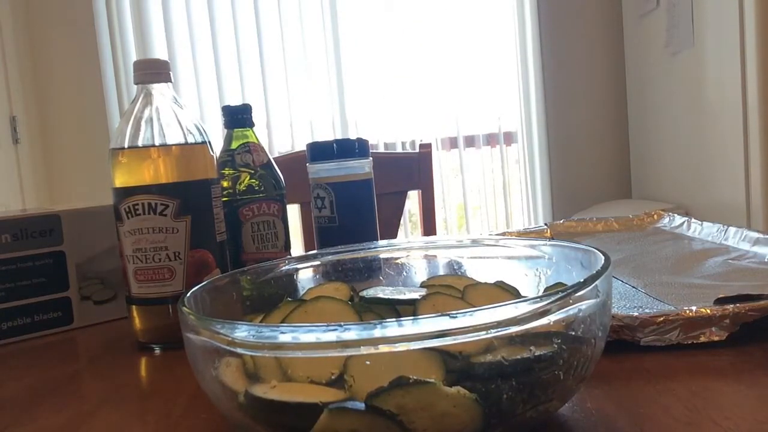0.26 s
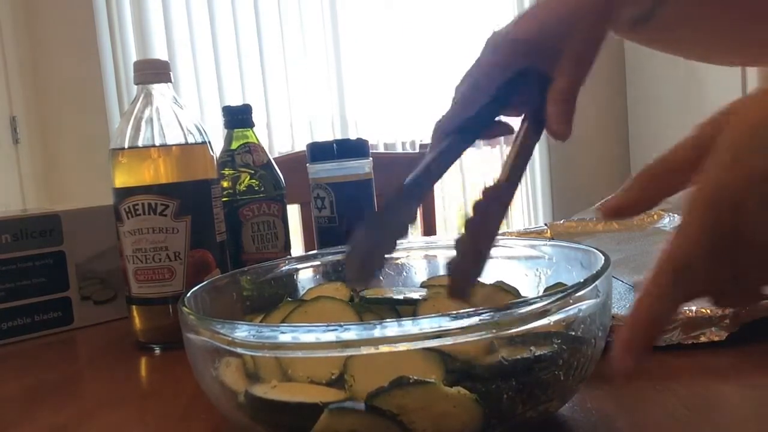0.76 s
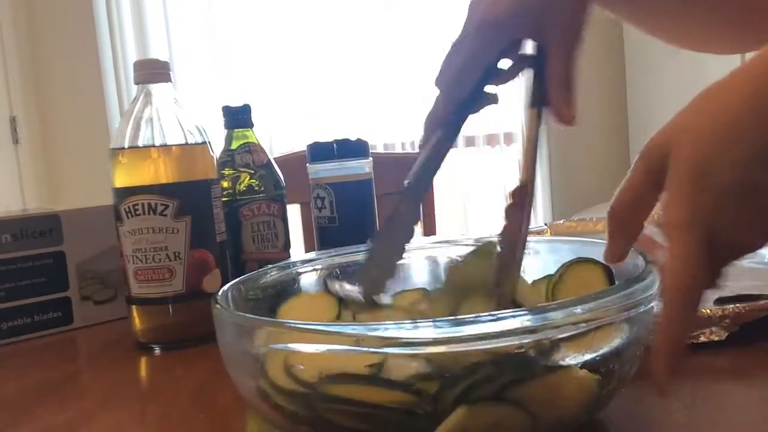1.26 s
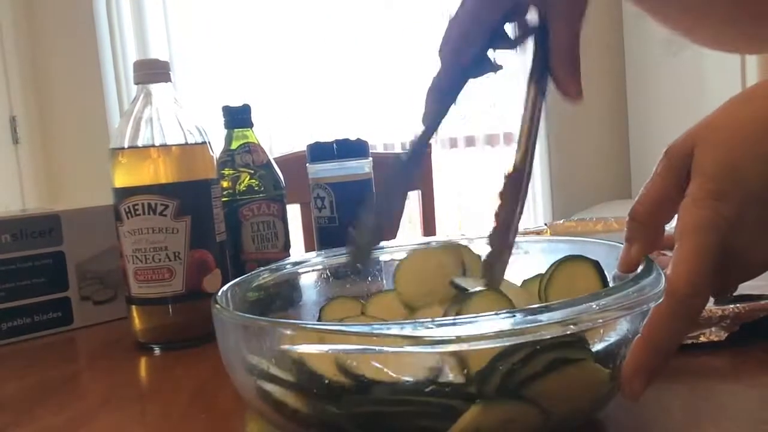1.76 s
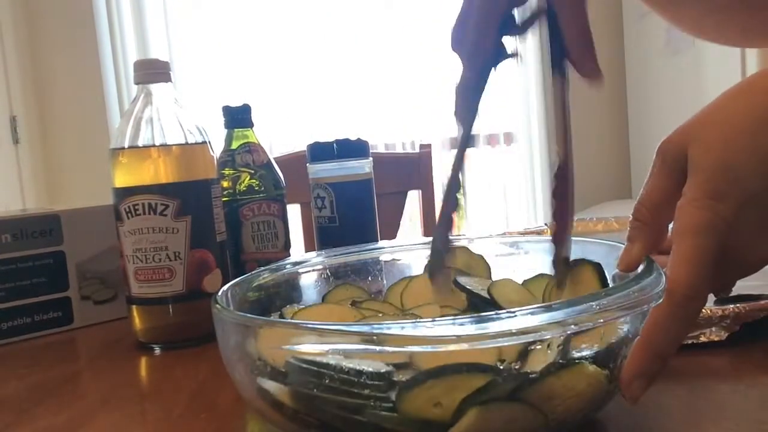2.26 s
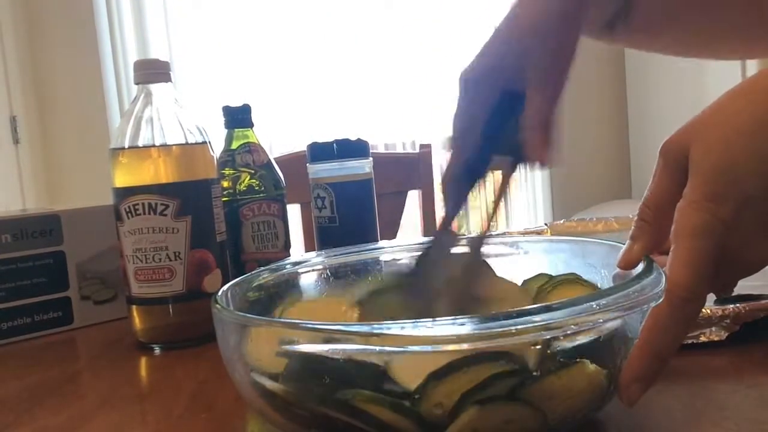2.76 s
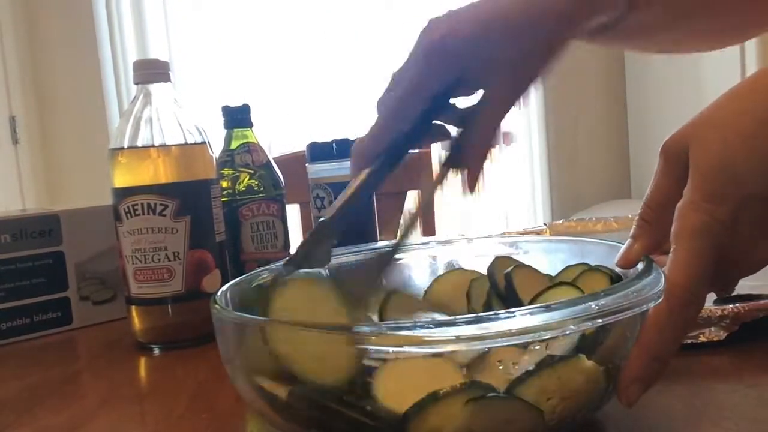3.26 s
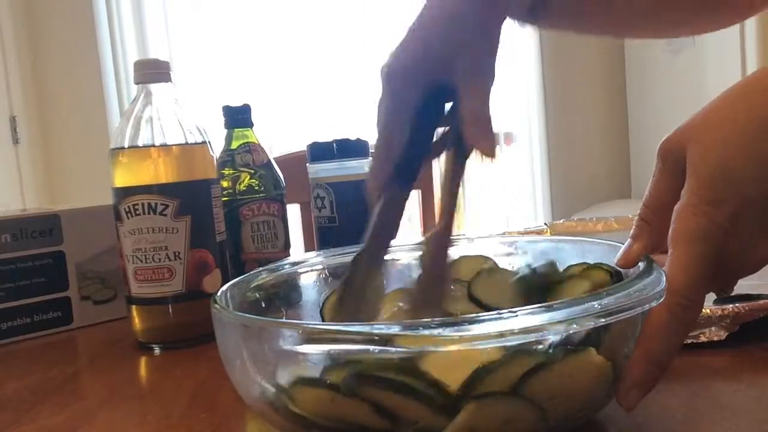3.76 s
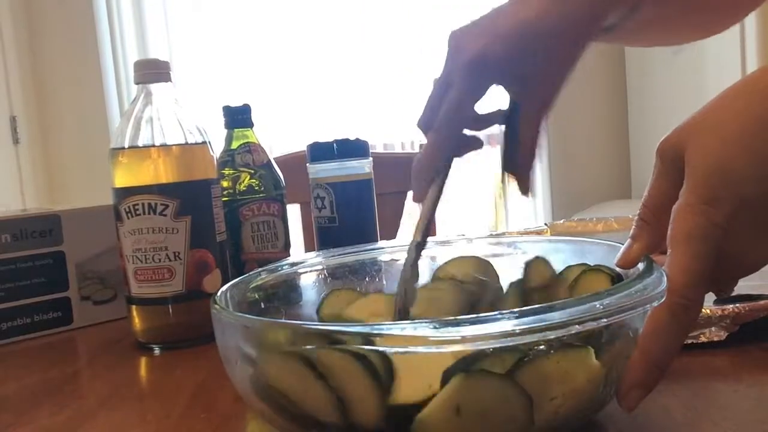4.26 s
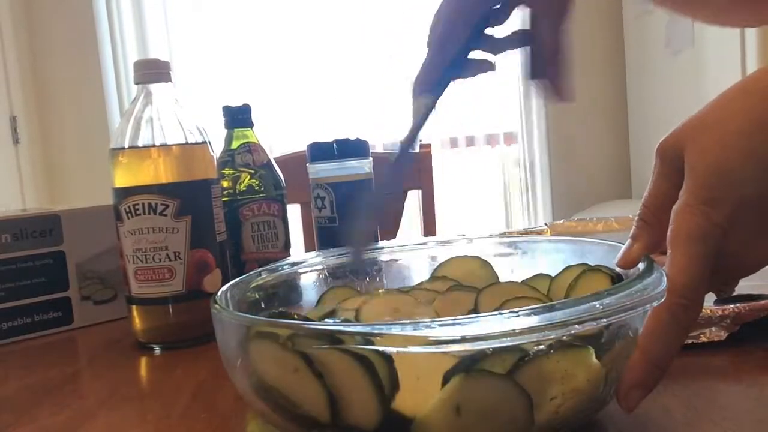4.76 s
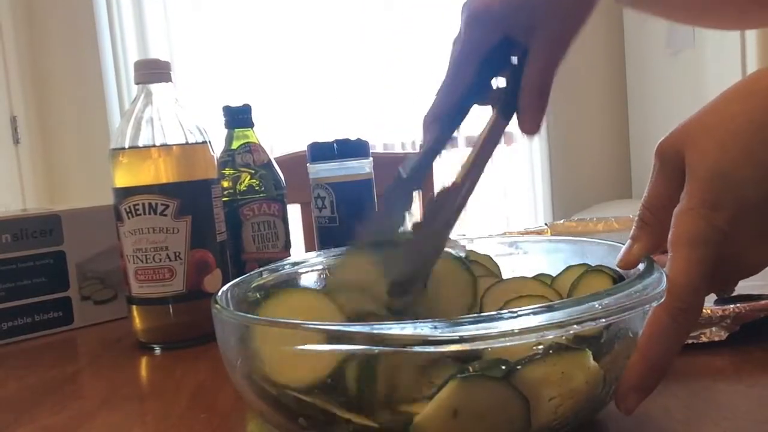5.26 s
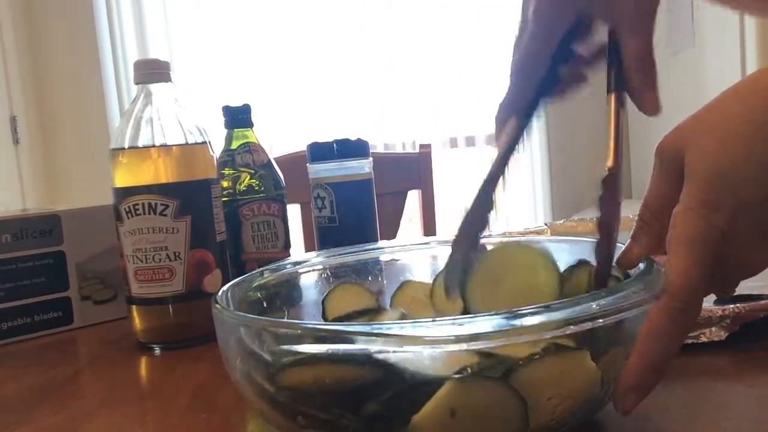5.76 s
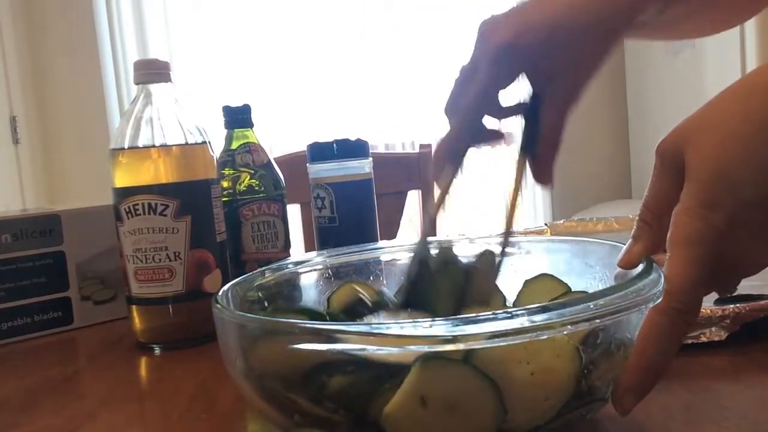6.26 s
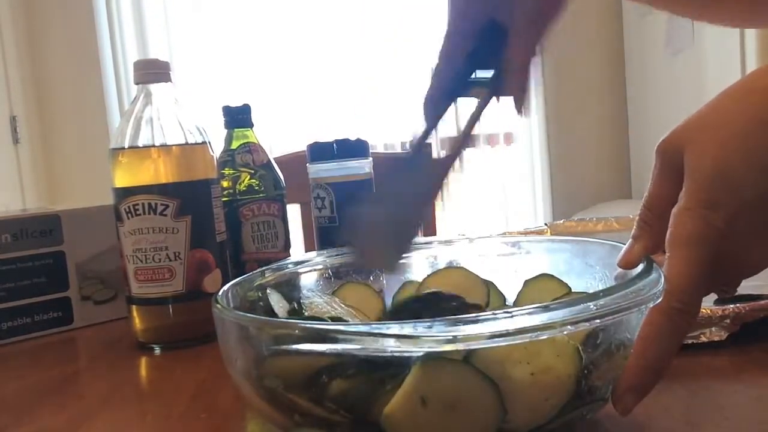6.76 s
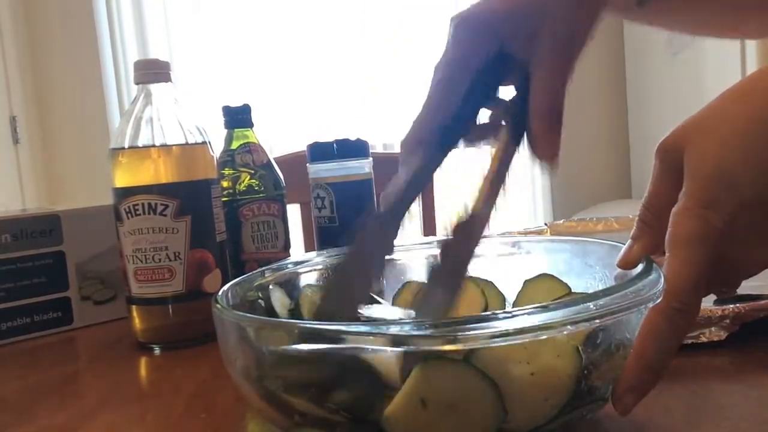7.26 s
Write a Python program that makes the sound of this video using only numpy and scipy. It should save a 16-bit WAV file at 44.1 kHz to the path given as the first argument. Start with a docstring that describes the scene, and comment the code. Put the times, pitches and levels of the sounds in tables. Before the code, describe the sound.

Wet vegetable slices slide, rustle and smack softly as steel tongs toss them in a thick glass bowl. Every so often the tongs strike the glass in a quick cluster of short clinks, and the bowl knocks on a wooden table, loudest twice in the second half. It is all heard close up in a kitchen with a short reverb and a faint, steady appliance hum.

```python
"""Wet vegetable slices slide and rustle over an appliance hum, tossed by steel tongs in a thick glass bowl.
The bowl knocks on a wooden table and the tongs clink on the glass; each blow rings modes under a crack.
Sliding slices make clumps of tiny pops and shake the table; slices parting or landing smack.
All of it is close, in a kitchen with a short reverb."""
import sys
import numpy as np
from scipy import signal
from scipy.fft import rfft, irfft, next_fast_len
from scipy.io import wavfile
from scipy.ndimage import uniform_filter1d

SR = 44100
rng = np.random.default_rng(int(sys.argv[2]) if len(sys.argv) > 2 else 0)


def dump(signal):
    """Clip the signal to [-1, 1] and save it as 16-bit WAV at the path in sys.argv[1]."""
    limited = np.clip(np.atleast_2d(signal).T, -1, 1)
    pcm = np.round(limited * 32767).astype(np.int16)
    wavfile.write(sys.argv[1], SR, pcm)


N = 330792


def gain_of(db):
    """Decibels to an amplitude factor."""
    return 10 ** (np.asarray(db) / 20)


def unit_rms(x):
    """Scales to rms 1."""
    return x / np.sqrt(np.mean(x ** 2) + 1e-20)


def unit_peak(x):
    """Scales to peak 1."""
    return x / (abs(x).max() + 1e-12)


def curve_at(points, hz):
    """Interpolates on a log-frequency axis."""
    f, value = np.transpose(points)
    return np.interp(np.log(hz + 1), np.log(f + 1), value)


def add(mix, start_s, sound):
    """Mixes a sound in at start_s."""
    part = mix[round(start_s * SR):][:len(sound)]
    part += sound[:len(part)]


def wander(top_hz):
    """Slow random curve, rms 1: 20 sines up to top_hz."""
    t = np.arange(0, N + 256, 256) / SR
    slow = sum(np.sin(2 * np.pi * (f * t + rng.random())) for f in top_hz * np.linspace(.05, 1, 20))
    return np.interp(np.arange(N) / SR, t, unit_rms(slow))


def colour(x, spectrum):
    """Filters x by a dB curve; rms 1."""
    size = next_fast_len(N)
    response = gain_of(curve_at(spectrum, np.fft.rfftfreq(size, 1 / SR)))
    return unit_rms(irfft(rfft(x, size) * response, size)[:N])


def swells(peak_s, swell_s, fade_s, db, rest_db):
    """Envelope of events above a resting level; swell_s and fade_s each span 20 dB."""
    t = np.arange(0, N + 64, 64)[:, None] / SR
    away = np.where(t < peak_s, (peak_s - t) / swell_s, (t - peak_s) / fade_s)
    power = (gain_of(db - 20 * away) ** 2).sum(1) + gain_of(rest_db) ** 2
    return np.interp(np.arange(N) / SR, t[:, 0], np.sqrt(power))


def resonate(force, modes, fall_db=60):
    """Drives modes that each lose fall_db over their listed t60; rms 1."""
    t = np.arange(8000) / SR
    ring = sum(gain_of(db - fall_db * t / t60) * np.sin(2 * np.pi * hz * t) for hz, db, t60 in modes)
    return unit_rms(signal.oaconvolve(force, ring)[:N])


def pop(hz, cycles):
    """Dying cycles that glide up as a pocket of air closes; long squeaks glide less."""
    u = np.arange(0, 3 * abs(cycles), hz / SR)
    age = u / abs(cycles)
    envelope = np.minimum(u / 1.4, 1) * np.exp(-2.5 * age)
    glide = 1 + 0.083 * age / (1 + (cycles / 12) ** 2)
    return envelope * np.sin(2 * np.pi * u * glide)


# Motor tones. Each row: frequency in Hz, level in dB.
MOTOR_TONES = [(59.2, -55), (290.7, -62.5), (522.2, -57), (581.4, -70), (1367, -81), (1427, -73.5)]
# Air noise. Each row: frequency in Hz, relative density in dB.
AIR_SPECTRUM = [(12, -40), (20, -8.5), (65, -2.5), (82, 2), (105, -4), (243, -2.5), (296, -11.5), (463, -5),
                (519, -10), (580, -14), (790, -20.5), (1200, -18.5), (1420, -15), (1940, -26),
                (5300, -30.5), (5720, -27), (6100, -32.5), (8000, -38), (13400, -49.5), (15100, -52.5),
                (16400, -71.5)]


def appliance_hum():
    """Slightly wavering motor tones over steady air noise."""
    t = np.arange(N) / SR
    trim_db, waver_db, drift_rad = 2, 1.3, .5
    air_db, sway_db = -53, 1.2
    tones = np.zeros(N)
    for hz, db in MOTOR_TONES:
        level = gain_of(db + trim_db + waver_db * wander(12))
        tones += level * np.sin(2 * np.pi * hz * t + drift_rad * wander(4.5))
    air = gain_of(air_db + sway_db * wander(3.7)) * colour(rng.standard_normal(N), AIR_SPECTRUM)
    return tones + air


def wet_patches(x, depth_db):
    """Wet patches come and go: spots some 700 Hz wide and 40 ms long swell and sink."""
    spectrum = signal.stft(x, nperseg=256, noverlap=192)[2]
    patches = rng.standard_normal(spectrum.shape[::-1]).T
    for _ in range(2):
        patches = uniform_filter1d(uniform_filter1d(patches, size=4, axis=0), size=20, axis=1)
    spectrum *= gain_of(depth_db * unit_rms(patches))
    return unit_rms(signal.istft(spectrum, nperseg=256, noverlap=192)[1][:N])


# Rustle filter. Each row: frequency in Hz, relative gain in dB.
RUSTLE_SPECTRUM = [(350, -69.5), (600, 6.5), (1230, -8.5), (1350, -20.5), (1610, -4), (2830, -10.5),
                   (3940, -12.5), (14300, -32), (16000, -63.5)]


def wet_rustle():
    """Clumps of tiny wet pops over a soft sliding hiss; the glass answers faintly."""
    base_pops_per_s, clump_db = 2500, 8.1
    pop_chance = base_pops_per_s / SR * gain_of(clump_db * wander(40))
    size_db = 8.2 * np.minimum(rng.exponential(1, N), 3.2)
    impulses = gain_of(size_db) * (rng.random(N) < pop_chance)
    pitch_index = rng.integers(0, 24, N)
    pops = sum(signal.oaconvolve(impulses * (pitch_index == k), pop(hz, cycles=2.5))[:N] * np.sqrt(hz)
               for k, hz in enumerate(np.geomspace(900, 14000, 24)))
    hiss = 1.6 * rng.standard_normal(N)
    rustle = colour(unit_rms(np.diff(pops, prepend=0)) + hiss, RUSTLE_SPECTRUM)
    rustle = wet_patches(rustle, depth_db=3)
    chime = resonate(np.diff(rustle, prepend=0), GLASS_MODES, fall_db=50)
    return rustle + gain_of(-15) * chime


# Slices sliding. Each row: peak time, swell and fade in seconds, rustle level in dB, rumble level in dB.
SLICE_SLIDES = [(.11, 0.2, 0.092, -61, -52), (.35, 0.086, 0.15, -49, -64), (.7, 1, 0.85, -61.5, -56.5),
                (1.06, 0.17, 0.076, -55.5, -69), (1.18, 0.1, 0.25, -53.5, -47),
                (1.47, 0.043, 0.29, -51, -49.5), (1.66, 0.57, 0.026, -60, -66),
                (2.0, 0.072, 0.27, -53.5, -48), (2.335, 0.018, 0.045, -63, -49.5),
                (2.44, 0.067, 0.1, -49.5, -41.5), (2.57, 0.053, 0.026, -69, -54),
                (2.863, 0.22, .13, -50.5, -50), (3.2, 0.054, 0.3, -54.5, -41.5),
                (3.321, 0.21, 0.19, -54, -48), (3.621, 0.14, 0.47, -63, -62.5),
                (3.85, 0.13, 0.14, -57.5, -52.5), (4.019, 0.12, 0.033, -66, -64.5),
                (4.19, 0.28, 0.019, -54.5, -59), (4.299, 0.25, 0.24, -55.5, -49.5),
                (4.562, 0.091, 0.98, -63, -56.5), (5.0, 0.047, 0.3, -52.5, -53),
                (5.37, 0.32, 0.12, -65, -54.5), (5.648, 0.51, 0.35, -59.5, -45.5),
                (5.951, .02, 0.087, -54.5, -49), (6.199, 0.17, 0.076, -64, -39),
                (6.601, 0.32, 0.4, -62, -57.5), (6.941, .11, 0.068, -68, -48.5),
                (7.001, 0.034, 0.21, -57, -50), (7.2, 0.42, 0.049, -68, -53), (7.46, 0.32, 0.5, -55.5, -49)]


def sliding_slices():
    """Slices rustle as they slide and splash at each smack; soft pushes shake the table's low modes."""
    peak_s, swell_s, fade_s, rustle_db, rumble_db = np.transpose(SLICE_SLIDES)
    smack_s, *_, splash_db = np.transpose(SLICE_SMACKS)
    lumpy_db, stutter_db = 3.2, 1.8
    rustle = wet_rustle()
    pushes = rng.standard_normal(N) * gain_of(lumpy_db * wander(25))
    rumble = resonate(pushes, TABLE_MODES[1:5])
    rumble *= swells(peak_s, swell_s, fade_s, rumble_db, rest_db=-61.5)
    slides = swells(peak_s, swell_s, fade_s, rustle_db, rest_db=-71)
    slides *= gain_of(stutter_db * wander(30))
    splashes = swells(smack_s, swell_s=0.0028, fade_s=0.019, db=splash_db, rest_db=-71)
    return rustle * np.hypot(slides, splashes) + rumble


def strikes(blows, modes, bands, voice, *, pivot_hz, rise_s, soften, punch, crack_t60_s,
            rattle_db, rattle_t60_s, rattle_loss, favour_db, favour_octaves, focus,
            snap_db, snap_s, snap_delay_s):
    """Each blow rings the modes, band by band, under a short crack; hardness and spot colour it."""
    longest_press_s, crack_loss = 0.00081, 0.05
    spread_db, detune = 3, .0025  # slices and hand shift the modes from blow to blow
    out, t = np.zeros(N), np.arange(SR // 4) / SR
    hz, mode_db, t60 = np.transpose(modes)[:, :, None]
    band_db, spot_db = np.transpose(voice)
    octaves = np.log2(np.prod(bands, axis=1) / pivot_hz ** 2) / 2
    for start_s, blow_db, hardness, spot, ring_factor, crack_db, favoured_hz in blows:
        press_s = min(rise_s * gain_of(-soften * blow_db), longest_press_s)  # light blows press longer
        contact = (1 - np.exp(-t / press_s)) ** 2
        # The spot hit rings most near one pitch, light taps most purely.
        nearness = np.exp(-(np.log2(hz / favoured_hz) / favour_octaves) ** 2)
        lift_db = favour_db * nearness + focus * blow_db * (1 - nearness)
        level_draw, pitch_draw = rng.standard_normal((2, *hz.shape))
        ring_db = mode_db + lift_db + spread_db * level_draw - 60 * t / (t60 * abs(ring_factor))
        rings = -contact * gain_of(ring_db) * np.sin(2 * np.pi * hz * (1 + detune * pitch_draw) * t)
        splinters, chatter = rng.standard_normal((2, len(t)))
        spike = punch * (abs(t - press_s) < .5 / SR)
        burst = splinters * gain_of(-60 * t / crack_t60_s) - spike
        rattle = (t == 0) + chatter * gain_of(rattle_db - 60 * t / rattle_t60_s)
        u = (t - snap_delay_s) / snap_s
        snap = u * np.exp(-u ** 2) / (1 + abs(u))  # the surfaces meet: one push and pull of air
        add(out, start_s, gain_of(blow_db + snap_db) * snap)
        levels_db = blow_db + band_db + hardness * octaves + spot * spot_db
        for level_db, (lo, hi) in zip(levels_db, bands):
            inside = (hz[:, 0] > lo) & (hz[:, 0] <= hi)
            band_lift_db = lift_db[inside].max(initial=focus * blow_db)
            band_rattle = rattle * gain_of(-t * hi * rattle_loss)
            ringing = signal.fftconvolve(rings[inside].sum(0), band_rattle)[:len(t)]
            ringing *= 1 - np.exp(-t * lo / 0.47)  # builds over about half a cycle
            crack = signal.sosfilt(signal.butter(3, [lo, hi], "band", fs=SR, output="sos"), burst)
            crack *= contact * gain_of(-t * hi * crack_loss)  # high splinters die first
            band = unit_peak(unit_peak(ringing) + gain_of(crack_db) * unit_peak(crack))
            add(out, start_s, gain_of(level_db + band_lift_db) * band)
    return out


# Bowl on table. Each row: start in seconds, level in dB, hardness in dB per octave,
# spot loaded (-1 board, 1 bowl foot), ring time factor, crack in dB, favoured pitch in Hz.
BOWL_KNOCKS = [(.299, -41.5, -4, 0.7, 0.34, -5, 171), (.317, -44.5, -7, -1, 0.64, -12, 223),
               (.338, -35.5, 7, 1.3, 0.87, -5, 545), (.356, -43.5, 5, 0, 0.61, -20, 763),
               (.374, -53.5, 12, 1.5, 0.51, -25, 800), (.386, -40, 9, 1.85, 0.53, -27, 526),
               (.394, -48, 6, 1.4, 0.58, -31, 830), (.43, -65, 3, 3, .95, -19, 816),
               (.49, -66, 9, 0.5, 0.98, -21, 850), (.891, -57, -6.5, -3, 0.55, 21, 171),
               (1.25, -46.5, -3.5, -0.5, 1, -22, 163), (1.337, -50.5, -9.5, 1, 0.81, 7, 202),
               (1.46, -34.5, -7.5, 0.58, 0.22, -10.5, 173.5), (1.489, -58, -2, -0.69, 0.35, 14, 178),
               (1.55, -52, -10, -.1, 0.96, -20, 203), (1.59, -57, -2, 0, 0.78, 2, 161),
               (1.996, -36.5, -1.5, -1.6, 0.38, 22, 168), (2.025, -31.5, -4.5, -1.7, 0.43, -5.5, 176),
               (2.09, -48, 1, -1.7, 0.44, -2, 166), (2.412, -45, -6.5, 0, 0.19, -9, 202),
               (2.668, -38.5, -10.5, -0.76, 0.95, 2, 570), (2.672, -36, 2, 1, 0.7, -9.5, 556.6),
               (2.726, -45.5, -11.5, 0.7, 0.93, -23, 534), (2.872, -57, -8.5, -3.5, 0.4, -26, 174),
               (3.2203, -25.5, -1.5, 0.7, 0.29, -5.5, 280), (3.275, -52.5, -12.5, 1.6, 0.75, -3, 706),
               (3.299, -53.5, -3.5, -1, 0.3, -11, 293), (3.67, -20, -1.5, 0.86, 0.77, 6, 293),
               (3.741, -21.5, -1, -1.2, 0.31, -8.5, 320), (4.18, -56, -6, -3, 0.73, 2, 160),
               (4.2, -49.5, -8.5, 1.3, 0.98, -10.5, 161), (4.2221, -5, -0.2, -0.24, 0.56, -5.5, 268.5),
               (4.2265, -19.5, -3.5, 2.5, 0.54, -24, 158), (4.242, -30.5, -5.5, -1.5, 0.52, -3, 198),
               (4.993, -49.5, 12.5, 0, .6, -11, 180), (5.052, -41.5, -6, 0.5, .4, -4.5, 274),
               (5.077, -47, -9, -1, 0.25, -7, 174.6), (5.288, -62, -0.5, -0.7, 0.41, -19, 163),
               (5.459, -35.5, 3, 0.5, 0.4, -5, 1000), (5.464, -40, -7, -1.04, 1, -9, 490),
               (5.5733, -24, -4, -0.4, 0.41, -11.5, 276), (5.958, -37, -9.5, 0, 1, -2.5, 820),
               (6.1284, -3.5, 2.5, 0.15, 0.47, -4.5, 275), (6.134, -32, -9, 0.8, 0.93, -20, 202),
               (7.456, -44, -9, .5, 0.91, -1, 179)]
# Each row: frequency in Hz, level in dB, base t60 in seconds.
TABLE_MODES = [(76, 0, .15), (161, 0, .16), (226, -4, .1), (296, 0, .11), (345, -6, .1), (488, 0, .12),
               (550, -4, .08), (610, -7, .08), (703, -8, .1), (797, 0, .08), (855, -7, .11), (980, -5, .07),
               (1136, -10, .06), (1308, -2, .06), (1577, 0, .05), (1981, -3, .04), (2116, 0, .03),
               (2266, -2, .03), (2611, -6, .025)]
# Each row: low edge in Hz, high edge in Hz.
TABLE_BANDS_HZ = [(50, 120), (120, 200), (200, 400), (400, 650), (650, 1200), (1200, 1800), (1800, 3000),
                  (3000, 6000), (6000, 15000)]
# Table and bowl response by band. Each row: level in dB, gain in dB per unit of spot.
TABLE_RESPONSE = [(-31, -0.5), (-14, -1.5), (-11, -1), (-2.5, 3.5), (2, 2), (-8.5, 0.5), (-14.5, -3.5),
                  (-24, -11.5), (-42, -9)]


def bowl_knocks():
    """The bowl knocks on the wooden table, rings its modes and chatters briefly."""
    return strikes(BOWL_KNOCKS, TABLE_MODES, TABLE_BANDS_HZ, TABLE_RESPONSE, pivot_hz=850,
                   rise_s=0.00033, soften=0.072, punch=22, crack_t60_s=0.33,
                   rattle_db=-26.5, rattle_t60_s=0.15, rattle_loss=0.2,
                   favour_db=14, favour_octaves=0.22, focus=0.034,
                   snap_db=10, snap_s=.00033, snap_delay_s=.00062)


# Each row: start in seconds, level in dB, pitch in Hz, decay length in cycles, splash of rustle in dB.
SLICE_SMACKS = [(1.04, -51, 5760, 20, -58), (1.122, -33, 5760, 3.3, -54), (1.1657, -35.5, 6100, 6.9, -66),
                (1.184, -48, 2270, 7.2, -53), (1.254, -48, 11500, 4, -55), (1.345, -44, 13000, 5, -57),
                (1.411, -30.5, 3480, 4.4, -47.5), (1.508, -31, 2420, 2.7, -64), (1.582, -42, 2900, 5, -62),
                (1.622, -51, 8000, 4, -57), (1.997, -21, 1620, 2.6, -64), (2.3334, -30, 3500, 3, -51),
                (2.43, -40, 2880, 3.9, -62), (2.4436, -32.5, 3670, 5.4, -57),
                (2.9828, -25.5, 1078, 10.4, -55), (3.1423, -43, 3410, 3.8, -71),
                (3.143, -48, 8200, 3.5, -60), (3.177, -36, 3700, 3.8, -70), (3.278, -43, 7460, 9, -43.5),
                (3.3339, -25.5, 3350, 7.9, -48.5), (3.386, -31, 2510, 2.5, -55),
                (4.0634, -42, 3930, 4.8, -70), (4.183, -40, 2700, 6.6, -59), (4.201, -43, 2980, 3, -37.5),
                (4.4018, -42, 3800, 3.5, -50), (4.444, -47, 3000, 5, -62), (4.479, -28, 3860, 2.4, -51),
                (4.9769, -35, 1220, 34, -67), (4.999, -36, 1687, 62, -62), (5.014, -33, 1210, 9.4, -68),
                (5.0524, -25, 1596, 3.2, -45), (5.265, -49, 4360, 31, -58), (5.3547, -60, 4060, 7.1, -63),
                (5.39, -46, 8500, 6.9, -62), (5.897, -37.5, 2810, 6.3, -62.5),
                (6.3988, -36, 2700, 3.1, -55), (6.625, -42.5, 1090, 5.6, -62),
                (6.79, -46.5, 11400, 26, -53.5), (6.935, -40, 1010, 3.4, -59),
                (6.979, -42, 2840, 6.2, -50.5), (7.2524, -28, 1080, 2.1, -47.5)]


def slice_smacks():
    """Slices part or land with single wet pops."""
    out = np.zeros(N)
    for start_s, db, hz, cycles, _ in SLICE_SMACKS:
        add(out, start_s, gain_of(db) * pop(hz, cycles))
    return out


# Tongs on glass. Each row: start in seconds, level in dB, hardness in dB per octave,
# spot struck (-1 deep, 1 high), ring time factor, crack in dB, favoured pitch in Hz.
TONG_CLINKS = [(1.155, -66, -7, 0.85, 0.68, -22, 1610), (1.3374, -63, -5, -0.22, 1.7, -12, 1610),
               (1.5633, -64, -11, -0.56, 0.58, -10, 1610), (1.814, -57, -7.5, -0.3, 0.64, -30, 1340),
               (1.8165, -58, -9.5, 0.45, 0.48, -19, 2640), (1.19, -60, -14, 0.13, 0.58, -12, 5800),
               (2.571, -64, 1.5, 0.025, 0.3, -15, 5750), (2.342, -64, -10.5, -0.45, 0.71, -19, 1350),
               (2.6675, -11.5, 3, -0.35, 0.54, -24, 2340), (2.6795, -46, 12, -0.46, 0.41, -5, 2650),
               (2.6935, -29, 4, 0, 0.67, -1, 2000), (2.7055, -27, 0.5, 0.35, 0.62, -15, 3250),
               (2.7254, -20, -1, -0.23, 0.27, 0, 4050), (2.85, -44.5, 2, -0.53, 0.57, 5, 3520),
               (3.6705, -14.5, 4, -0.4, 0.41, -4, 3320), (3.673, -20.5, 9, -0.62, 0.14, -17.5, 4550),
               (3.677, -31, -9, -0.55, 0.84, -23, 1490), (3.681, -33, 0.5, 0.091, 0.6, -15, 2760),
               (3.685, -29.5, 9.5, 0.043, 0.27, -14, 4570), (3.704, -40, 5, -0.41, 0.28, -2, 4460),
               (3.741, -22, 1.5, 0.09, 0.22, -5, 970), (3.743, -34.5, 4, -0.32, 0.31, -11.5, 6400),
               (5.4564, -19, 4, -0.2, 0.44, -4, 2780), (5.459, -28.5, 0, 0.5, 0.36, -10, 4130),
               (5.4715, -28.5, -5.5, -0.38, 0.31, -13, 4000), (5.484, -38.5, 7.5, -0.076, 0.51, -3.5, 5800),
               (5.4964, -39, -6.5, -0.83, 0.81, -16, 2580), (5.509, -36, 2, 0.63, 0.24, -7.5, 3400),
               (5.5204, -33.5, -0.5, -0.23, 0.36, 1, 1430), (5.9574, -17, -1.5, -0.92, 0.24, -1, 3880),
               (5.9605, -24, -2.5, -0.13, 0.84, -18, 2560), (5.961, -33, 2.5, 0.45, 0.6, -14.5, 5650),
               (5.974, -25, -1.5, 0.37, 0.45, -4, 5570), (5.9893, -27, -1.5, 0.035, 0.27, -6, 4150),
               (6.018, -49.5, -7.5, -0.3, 0.3, -8.5, 2900), (6.038, -51, -4.5, -0.35, 0.5, -4, 2000),
               (6.069, -63, -8, -0.2, 0.29, -2, 3970), (6.39, -60.5, -8, 0, 0.7, -16.5, 4620)]
# Each row: frequency in Hz, level in dB, base t60 in seconds.
GLASS_MODES = [(555, 0, .2), (834, -10, .1), (1012, -8, .1), (1357, 0, .12), (1610, 0, .08),
               (1981, -4, .07), (2562, -8, .07), (2648, 0, .11), (2760, -7, .1), (3060, -6, .07),
               (3300, 0, .04), (3420, -3, .05), (3580, -2, .06), (3860, 0, .06), (4151, 0, .075),
               (4230, -9, .07), (4500, -2, .08), (4660, -10, .07), (5168, -14, .05), (5745, 0, .075),
               (6142, -9, .06), (6580, -4, .06), (6918, -8, .05), (7456, -3, .04), (8050, -5, .05),
               (8600, -5, .025), (8900, -4, .022), (9380, 0, .025), (9700, -3, .02), (10150, -4, .02),
               (10700, -5, .02), (11250, -2, .02), (12200, -4, .02), (13360, -2, .018), (14120, 0, .015),
               (15000, -4, .015)]
# Each row: low edge in Hz, high edge in Hz.
GLASS_BANDS_HZ = [(450, 700), (700, 1200), (1200, 1500), (1500, 2200), (2200, 3000), (3000, 3900),
                  (3900, 4320), (4320, 5300), (5300, 6300), (6300, 8500), (8500, 11700), (11700, 16000)]
# Glass response by band. Each row: level in dB, gain in dB per unit of spot.
GLASS_RESPONSE = [(-15.5, -1), (-4, 17), (-4, -3.5), (0.5, -1), (0, -1.5), (-3, -5.5), (2.8, 6), (-3, -6.5),
                  (-1, 7.5), (-0.5, -3.5), (-1.5, 6), (-6, 2.5)]


def tong_clinks():
    """Steel strikes thick glass; the short, hard contact rings its high modes."""
    return strikes(TONG_CLINKS, GLASS_MODES, GLASS_BANDS_HZ, GLASS_RESPONSE, pivot_hz=3500,
                   rise_s=0.00008, soften=0.8, punch=2.3, crack_t60_s=0.039,
                   rattle_db=-24.5, rattle_t60_s=0.07, rattle_loss=0.0089,
                   favour_db=6.5, favour_octaves=0.17, focus=0.15,
                   snap_db=3, snap_s=.00006, snap_delay_s=0.0011)


# Room decay. Each row: frequency in Hz, t60 in seconds.
KITCHEN_T60 = [(100, 0.54), (500, 0.38), (2000, 0.41), (6000, 0.32), (15000, 0.23)]


def kitchen_reverb(x):
    """Sparse reflections of random sign, one per 20 samples, each band dying at its own rate."""
    taps, starts = np.zeros(SR // 2), np.arange(200, SR // 2 - 20, 20)
    taps[starts + rng.integers(0, 20, len(starts))] = rng.choice([-1., 1.], len(starts))
    hz, t, spectrum = signal.stft(taps, SR, nperseg=256)
    decay = gain_of(-60 * t / curve_at(KITCHEN_T60, hz)[:, None])
    tail = signal.istft(spectrum * decay, SR, nperseg=256)[1]
    return signal.oaconvolve(x, tail / np.linalg.norm(tail))[:N]


def scene():
    """Tongs, bowl, slices and hum in the kitchen; both channels alike."""
    clinks = tong_clinks()
    knocks = bowl_knocks()
    slices = slice_smacks() + sliding_slices()
    room = kitchen_reverb(gain_of(-16.5) * clinks + gain_of(-16) * knocks + gain_of(-14.5) * slices)
    mix = clinks + knocks + slices + room + appliance_hum()
    return np.array([mix, mix])


def record(dry):
    """Bass cut, gain control that ducks after loud knocks, slight stereo skew, clipping, treble cut."""
    low_cut_hz, centred_below_hz, high_cut_hz = 45, 250, 16480
    threshold_db, duck_db_per_db, detector_fall_db_per_s = -29, 0.12, 43
    heard = signal.sosfilt(signal.butter(2, low_cut_hz, "high", fs=SR, output="sos"), dry)
    power_db = 10 * np.log10(abs(uniform_filter1d(heard[0] ** 2, 400)) + 1e-12)
    fall_db = np.arange(N) * detector_fall_db_per_s / SR
    held_db = np.maximum.accumulate(power_db + fall_db) - fall_db
    over_db = np.maximum(held_db - threshold_db, 0)
    left, right = heard / gain_of(duck_db_per_db * uniform_filter1d(over_db, 200))
    left = np.roll(left, 1)  # one sample late
    mid, side = (left + right) / 2, (left - right) / 2
    side = signal.sosfiltfilt(signal.butter(1, centred_below_hz, "high", fs=SR, output="sos"), side)
    clipped = np.clip([mid + side, mid - side], -1, 1)
    lowpass = signal.firwin(1535, high_cut_hz, window=("kaiser", 9), fs=SR)
    return signal.oaconvolve(clipped, lowpass[None], "same")


dry = scene()
out = record(dry)
dump(out)
```